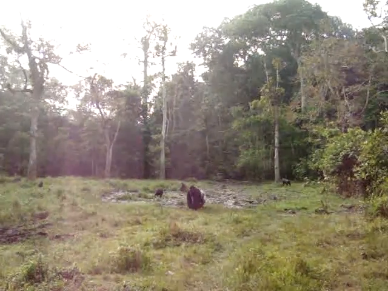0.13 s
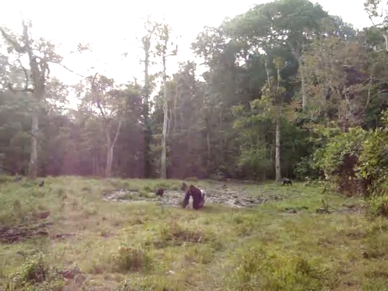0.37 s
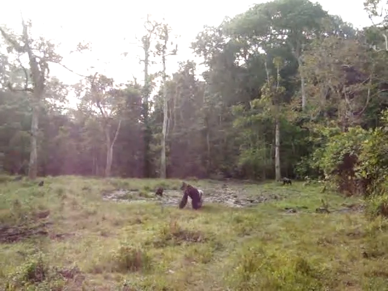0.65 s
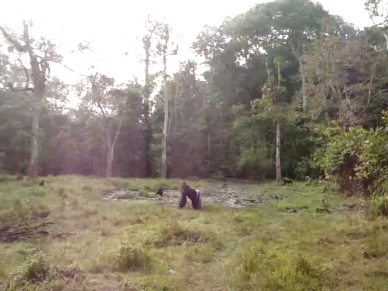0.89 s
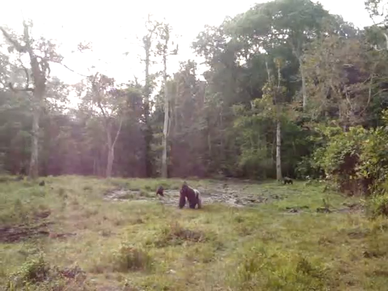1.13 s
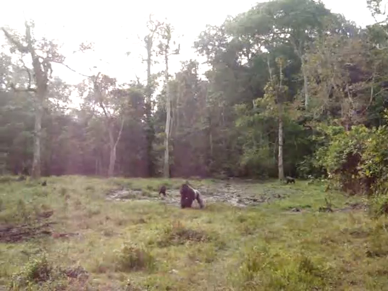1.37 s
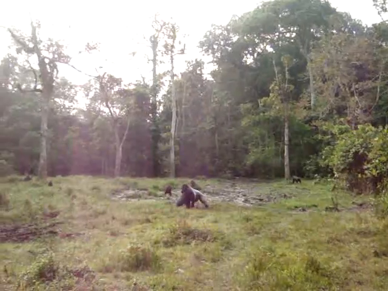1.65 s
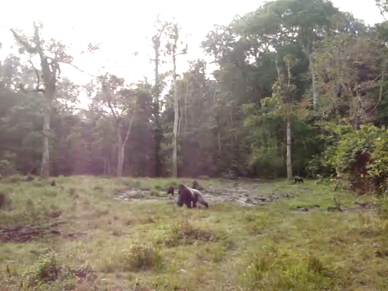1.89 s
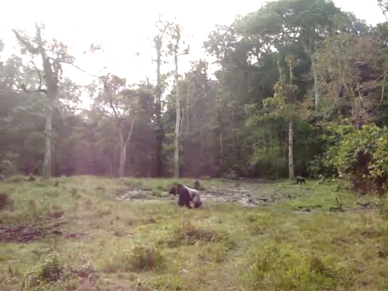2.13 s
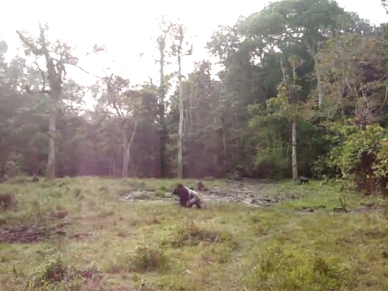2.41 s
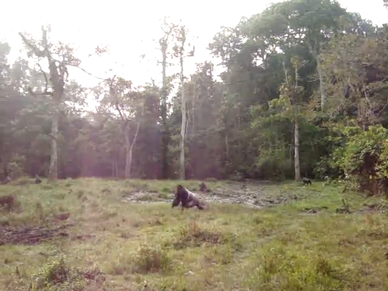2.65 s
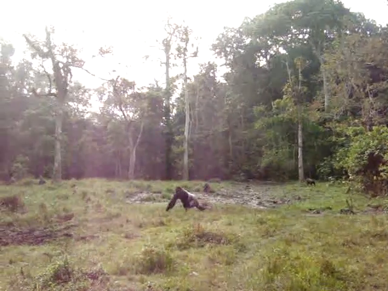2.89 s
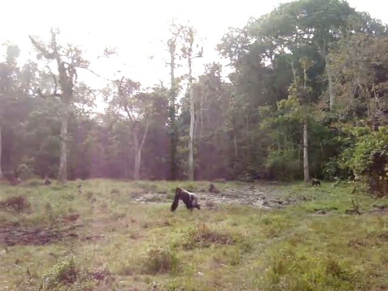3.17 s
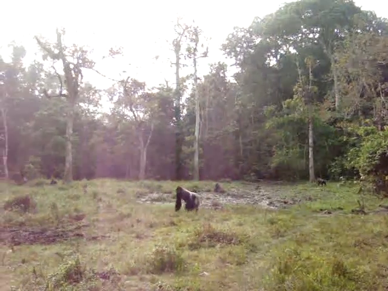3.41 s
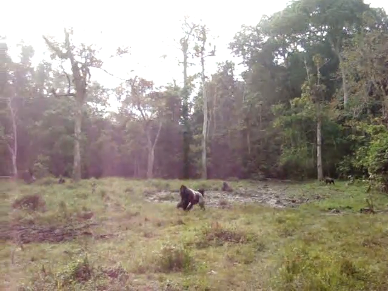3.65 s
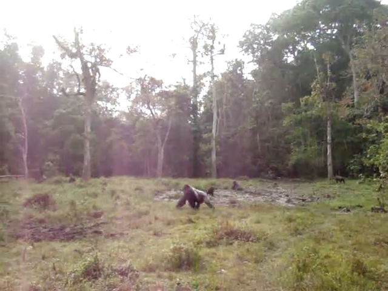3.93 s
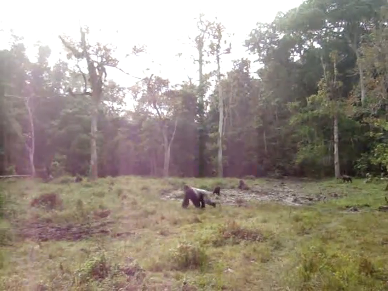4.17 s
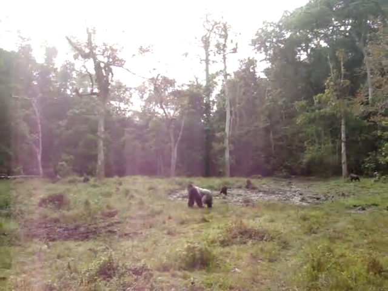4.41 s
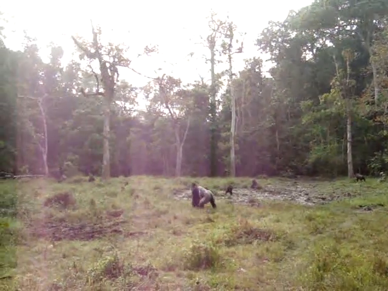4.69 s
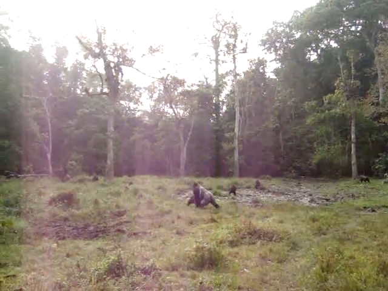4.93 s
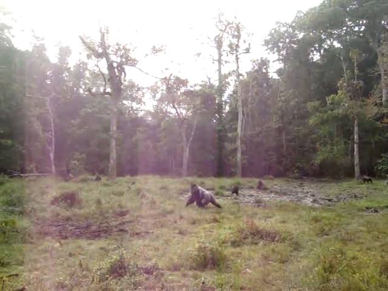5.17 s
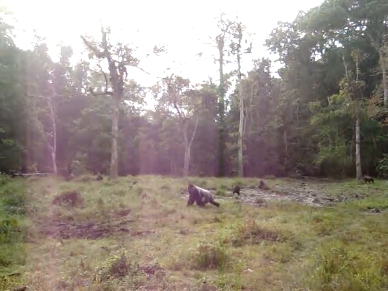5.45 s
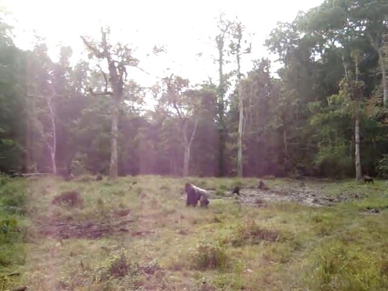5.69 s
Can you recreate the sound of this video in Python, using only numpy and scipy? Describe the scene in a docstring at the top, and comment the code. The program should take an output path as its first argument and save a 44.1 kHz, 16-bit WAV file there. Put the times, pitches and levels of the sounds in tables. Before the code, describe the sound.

A continuous insect wall heard outdoors by a small single microphone: bright hiss, crickets droning in a tight high cluster, and a nearby cicada with a fast pitch flutter, blurred by trees. Short rough trills come and go. A barely audible grassy rustle passes early, tiny ticks follow, then a low woody knock, a cluster of thin gliding bird notes and another crisp knock. The gorilla walking in the distance is not heard.

```python
"""Humid forest clearing by day: far-insect hiss (shaped noise), droning crickets (throbbing tones),
katydid trills (bursts of rough strokes), faint birds (gliding whistles), a brief grass rustle (noise),
a few close wooden knocks (decaying modes) and a near cicada (overtones of a click train, the seventh
thickened by a throbbing tone) that wavers in pitch nine times a second. Noise tails smear the cicada,
crickets, katydids and birds, as trees would."""
import sys
import numpy as np
from scipy import signal
from scipy.io import wavfile
from scipy.ndimage import uniform_filter1d

SR = 44100
rng = np.random.default_rng(int(sys.argv[2]) if len(sys.argv) > 2 else 0)


def attenuation_scalar(level_db):
    """Turn a level in dB into a linear amplitude multiplier (20 dB per decade)."""
    decades = np.asarray(level_db, float) / 20
    return 10 ** decades


def generate_wav(signal):
    """Clip the signal to [-1, 1] and save it as 16-bit WAV at the path in sys.argv[1]."""
    frames = np.transpose(np.atleast_2d(signal))
    scaled = np.clip(frames, -1, 1) * 32767
    pcm = np.round(scaled).astype(np.int16)
    wavfile.write(sys.argv[1], SR, pcm)


N = 256214
t = np.arange(N) / SR

# spectrum of air and far insects: (frequency [Hz], relative density [dB])
HISS_SPECTRUM = [(30, -27), (80, -14), (200, -2), (400, 1), (900, -1), (1600, -5), (3300, -9), (3900, 1.5),
                 (4450, 2), (4800, 4), (5300, 3), (5600, 8.5), (6100, -1), (6700, -9.5), (7600, -8.5),
                 (8800, 0), (9600, -9.5), (10150, -22.5)]
# crickets, and at 4362 Hz a throbbing tone that thickens the near cicada's seventh overtone:
# (pitch [Hz], rms wander [Hz], relative level [dB], throb rate [1/s])
THROBBING_TONES = [(3560, 12, -17, 14), (3712, 15, -12, 30), (3790, 20, -14, 14), (3836, 20, -9, 30),
                   (3950, 15, -7, 14), (3995, 18, -4, 30), (4050, 15, -9, 8), (4085, 9, -2, 14.5),
                   (4112, 7, 0, 30), (4160, 12, -8, 8), (4204, 10, -11, 14), (4300, 15, -12, 14),
                   (4362, 9, -5, 9), (5070, 20, -10, 30), (5545, 25, -7, 10), (5680, 30, -9, 16),
                   (5845, 15, -12, 10)]
# joint level of the throbbing tones: (time [s], level [dB])
THROBBING_LEVEL = [(0, -51), (1.4, -47), (2.0, -50.5), (2.6, -48), (4.1, -49), (5.81, -50.5)]
# katydid trills: (start [s], end [s], mid-stroke pitch [Hz], level before scatter [dB])
TRILLS = [(.272, .53, 8800, -59), (.804, 1.12, 8780, -59), (1.596, 1.87, 8780, -59),
          (2.392, 2.6, 8800, -60), (2.971, 3.25, 8800, -59), (3.73, 3.99, 8850, -59),
          (4.408, 4.56, 9000, -63), (4.681, 4.92, 8780, -59), (4.976, 5.1, 9000, -63),
          (5.499, 5.81, 8800, -58)]
# distant bird notes: (start [s], length [s], first pitch [Hz], last pitch [Hz],
#                      mid-note level before scatter [dB], rms fuzziness [Hz])
BIRD_NOTES = [(2.9, .04, 3250, 2750, -62, 60), (3.21, .22, 7150, 7480, -59, 200),
              (3.285, .05, 3400, 2600, -60, 60), (3.48, .08, 3450, 3450, -64, 30),
              (3.61, .04, 7500, 7200, -61, 300), (3.665, .08, 7650, 6600, -56, 350),
              (3.69, .06, 3300, 2500, -62, 60), (3.82, .07, 7250, 6750, -58, 300),
              (3.905, .07, 2520, 2770, -63, 10), (3.96, .11, 2760, 2810, -63, 10),
              (4.62, .15, 7800, 7050, -63, 50), (5.14, .07, 7300, 7150, -61, 120)]
# knocks: (time [s], strike level [dB], main mode [Hz], main mode t60 [s], brightness [dB/octave])
KNOCKS = [(1.283, -44, 1150, .015, -6), (1.294, -48, 1150, .015, -6), (1.383, -50, 3100, .012, -8),
          (2.7083, -28.5, 755, .018, -12), (4.669, -45, 1250, .010, 9), (4.7243, -32.5, 1210, .014, 0)]
# modes of the struck wood: (multiple of the main mode [1], relative level [dB])
WOOD_MODES = [(.68, -10), (1, 0), (1.33, -8), (1.63, -5), (2.6, -3)]
# overtones the cicada's body lets through: (multiple of the click rate [1], relative level [dB])
CICADA_BODY = [(6, -24.5), (7, -12.5), (8, 7.5), (9, -22), (10, -21.5)]
# near cicada effort: (time [s], level [dB])
CICADA_EFFORT = [(0, -45.5), (1.6, -44.5), (2.3, -43), (4.7, -44), (5.81, -45)]
# cicada pumping pace, held until the next row: (from [s], waver rate [1/s])
CICADA_PACE = [(0, 9.171), (2.7, 8.87), (3.602, 9.4), (4.453, 9.11), (5.331, 9.32)]

HISS_DB, EDGE_HZ = -47, 10170
SURGE_DB = 0.25  # quick chance swells of all throbbing tones together, rms
NOTE_ENDS_DB = -4  # bird notes swell from and sink to this, relative to mid-note
RUSTLE_START_S, RUSTLE_RISE_S, RUSTLE_HOLD_S, RUSTLE_FALL_S, RUSTLE_DB = .1, .6, .43, .2, -61
BOUNCE_S, BOUNCE_DB = .004, -4
FIRST_TOP_S = .083  # pumping phase zero, near the highest pitch
EASY_CLICKS_PER_S, CLICKS_PER_S_PER_DB, EASY_DB = 619.6, .7, -44.5  # click rate rises with effort


def evened(x):
    """Scales to rms 1."""
    return x / np.sqrt(np.mean(x ** 2) + 1e-20)


def drift(rate_hz):
    """Smooth chance of rms 1: sines of random phase up to rate_hz, the slower the stronger."""
    hz = np.geomspace(rate_hz / 20, rate_hz, num=16)[:, None]
    coarse_s = t[::64]
    waves = np.sin(2 * np.pi * (hz * coarse_s + rng.random(hz.shape)))
    return np.interp(t, coarse_s, evened((waves / np.sqrt(hz)).sum(0)))


def add(mix, start_s, sound):
    """Mixes a sound in at a time."""
    part = mix[round(start_s * SR):][:len(sound)]
    part += sound[:len(part)]


def trees(x, t60_s, wet_db, sway_hz):
    """Scatter from trunks and leaves: three dying noise tails trade places as air moves; rms 1."""
    u = np.arange(SR // 2) / SR
    tails = rng.standard_normal((3, len(u))) * attenuation_scalar(-60 * u / t60_s)
    tails /= np.linalg.norm(tails, axis=1)[:, None]
    turn = np.pi * (sway_hz * t + np.arange(3)[:, None] / 3)
    feeds = x * np.cos(turn) * np.sqrt(2 / 3)
    wet = signal.fftconvolve(feeds, tails, axes=1)[:, :N].sum(0)
    return evened(x + attenuation_scalar(wet_db) * wet)


def hiss():
    """Air and far insects: random short-time spectra with small drifting patches."""
    frames, hz = N // 256 + 5, np.fft.rfftfreq(1024, 1 / SR)
    real, imag, patches = rng.standard_normal((frames, 513, 3)).T
    patches = uniform_filter1d(patches, size=10, axis=0)
    patches = evened(uniform_filter1d(patches, size=10, axis=1))
    table_hz, table_db = np.transpose(HISS_SPECTRUM)
    shape_db = np.interp(np.log(hz + 1), np.log(table_hz), table_db)[:, None]
    flicker_db = 1.38 * np.clip(hz / 4000, 0, 1)[:, None] * patches  # insects flicker, low air is smooth
    spectra = (real + 1j * imag) * attenuation_scalar(shape_db + flicker_db) * (hz < EDGE_HZ)[:, None]
    noise = signal.istft(spectra, nperseg=1024, noverlap=768)[1][:N]
    return attenuation_scalar(HISS_DB) * evened(noise)


def throbbing_tones():
    """Crickets, plus the tone on the cicada's seventh overtone: wandering pitches, each throbbing."""
    field = np.zeros(N)
    for hz, wander_hz, db, throbs_per_s in THROBBING_TONES:
        tone = np.cos(2 * np.pi * np.cumsum(hz + wander_hz * drift(40)) / SR)
        throb_turns = throbs_per_s * t + 0.28 * drift(4) + rng.random()
        throb = 1 + 0.78 * np.cos(2 * np.pi * throb_turns)
        field += attenuation_scalar(db + .9 * drift(6)) * throb * tone
    level_db = np.interp(t, *np.transpose(THROBBING_LEVEL)) + SURGE_DB * drift(14)
    return trees(field, t60_s=.24, wet_db=-4, sway_hz=1.45) * attenuation_scalar(level_db)


def katydids():
    """Each wing stroke is a short rough tone that rises; about 49 strokes a second."""
    out = np.zeros(N)
    for start_s, end_s, hz, db in TRILLS:
        u = np.arange(-.01, end_s - start_s, 1 / SR)
        stroke = (u * 49.2) % 1
        rasp = evened(uniform_filter1d(rng.standard_normal(len(u)), size=90))
        pitch_hz = hz + 200 * (stroke - .5) + 170 * rasp
        tone = np.cos(2 * np.pi * np.cumsum(pitch_hz) / SR)
        pulse = np.exp(-((stroke - .5) / .19) ** 2)
        trill = attenuation_scalar(db) * evened(tone * pulse) * signal.windows.tukey(len(u), .12)
        add(out, start_s - .01, trill)
    return np.sqrt(np.mean(out ** 2)) * trees(out, t60_s=.15, wet_db=-10, sway_hz=1.5)


def birds():
    """Thin gliding whistles, some roughened into a buzz by pitch noise."""
    out = np.zeros(N)
    for start_s, length_s, first_hz, last_hz, db, fuzz_hz in BIRD_NOTES:
        u = np.arange(0, length_s, 1 / SR) / length_s
        fuzz = evened(uniform_filter1d(rng.standard_normal(SR // 2), size=60))[:len(u)]
        pitch_hz = first_hz + (last_hz - first_hz) * u + fuzz_hz * fuzz
        note = np.sqrt(2) * np.cos(2 * np.pi * np.cumsum(pitch_hz) / SR)
        level_db = db + NOTE_ENDS_DB * (2 * u - 1) ** 2
        add(out, start_s, note * attenuation_scalar(level_db) * signal.windows.tukey(len(u), .3))
    return np.sqrt(np.mean(out ** 2)) * trees(out, t60_s=.2, wet_db=-9, sway_hz=1.5)


def rustle():
    """Brushed grass: dense dull noise grains swell, hold and stop."""
    corners_s = np.cumsum([RUSTLE_START_S, RUSTLE_RISE_S, RUSTLE_HOLD_S, RUSTLE_FALL_S])
    grains = rng.standard_normal(N) * attenuation_scalar(2 * drift(40))
    band = signal.butter(2, [1400, 3100], "band", fs=SR, output="sos")
    swell = np.interp(t, corners_s, [0, 1, 1, 0])
    return evened(signal.sosfilt(band, grains)) * attenuation_scalar(RUSTLE_DB) * swell


def knocks():
    """Short wooden modes, higher ones dying sooner, struck with a crack and again by a bounce."""
    out, u = np.zeros(N), np.arange(SR // 10)[:, None] / SR
    modes, modes_db = np.transpose(WOOD_MODES)
    band = signal.butter(2, [500, 3500], "band", fs=SR, output="sos")
    crack = evened(signal.sosfilt(band, rng.standard_normal(len(u))))
    for start_s, db, hz, t60_s, bright_db in KNOCKS:
        tilt_db = bright_db * np.maximum(np.log2(modes), 0)
        level_db = modes_db + tilt_db - 60 * u * np.sqrt(modes) / t60_s
        attack = 1 - np.exp(-u * hz / .8)
        ring = attenuation_scalar(level_db) * np.sin(2 * np.pi * hz * modes * u) * attack
        blow = attenuation_scalar(db) * ring.sum(1)
        blow += attenuation_scalar(db - 14) * crack * attenuation_scalar(-90 * u[:, 0] / t60_s)
        add(out, start_s, blow)
        add(out, start_s + BOUNCE_S, attenuation_scalar(BOUNCE_DB) * blow)
    return out


def overtones(clicks_per_s, body):
    """A regular click train heard through a narrow body: a few of its overtones."""
    turns = np.cumsum(clicks_per_s) / SR
    return sum(attenuation_scalar(db) * np.cos(2 * np.pi * (k * turns + rng.random())) for k, db in body)


def near_cicada():
    """The abdomen pumps, so the click rate swings each cycle; a neighbour answers out of step."""
    since_s, pace = np.transpose(CICADA_PACE)
    pace_now = pace[np.searchsorted(since_s, t, "right") - 1]
    cycles = np.cumsum(pace_now) / SR - pace[0] * FIRST_TOP_S
    effort_db = np.interp(t, *np.transpose(CICADA_EFFORT))
    clicks_per_s = EASY_CLICKS_PER_S + CLICKS_PER_S_PER_DB * (effort_db - EASY_DB)
    song = np.zeros(N)
    # (lag [cycles], rms looseness [cycles], relative level [dB])
    for lag, looseness, db in [(0, .02, 0), (.4, .12, -8)]:
        turn = 2 * np.pi * (cycles - lag + looseness * drift(3))
        swing = np.cos(turn) - .26 * np.sin(2 * turn) - .13 * np.cos(3 * turn)  # climbs faster than it falls
        pump_db = 1.9 * np.cos(2 * turn) + 2.1 * np.sin(turn) + 1.3 * np.cos(turn)
        voice = overtones(clicks_per_s + 5.3 * swing + .25 * drift(17), CICADA_BODY)
        song += attenuation_scalar(db + pump_db + .8 * drift(40)) * voice
    return trees(song, t60_s=.5, wet_db=-1.5, sway_hz=2.5) * attenuation_scalar(effort_db)


def scene():
    """All sources at one small microphone."""
    return (hiss() + throbbing_tones() + katydids() + birds() + rustle() + knocks() + near_cicada())[None]


def band_limit(x):
    """A steep low-pass at the top of the band."""
    return signal.sosfilt(signal.butter(12, 10610, fs=SR, output="sos"), x)


def record(dry):
    """Limits the band near 10 kHz with a steep linear-phase low-pass."""
    lowpass = signal.firwin(1023, EDGE_HZ, window=("kaiser", 10), fs=SR)
    limited = signal.oaconvolve(dry, lowpass[None], "same")
    return band_limit(limited)


dry = scene()
out = record(dry)
generate_wav(out)
```